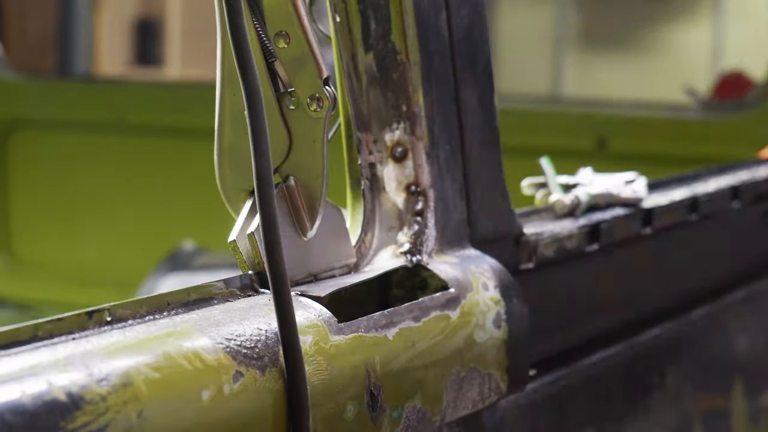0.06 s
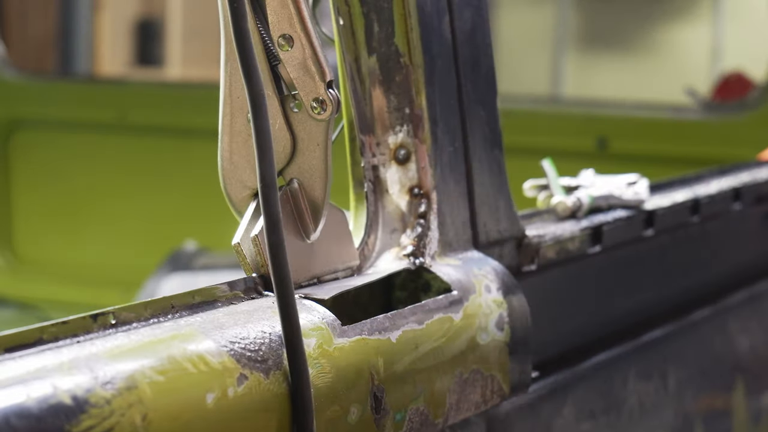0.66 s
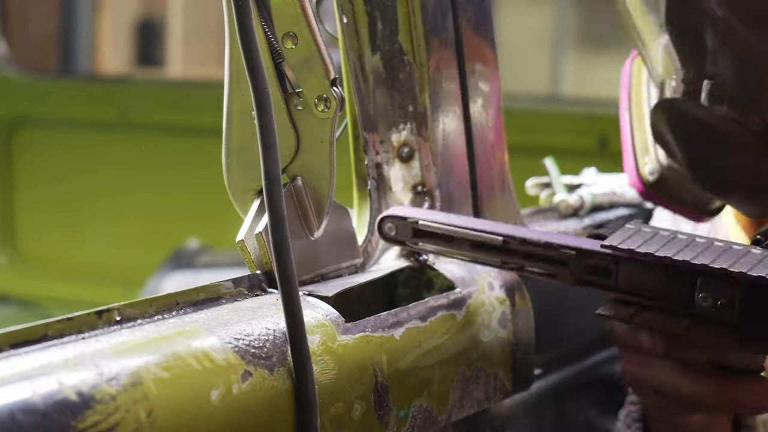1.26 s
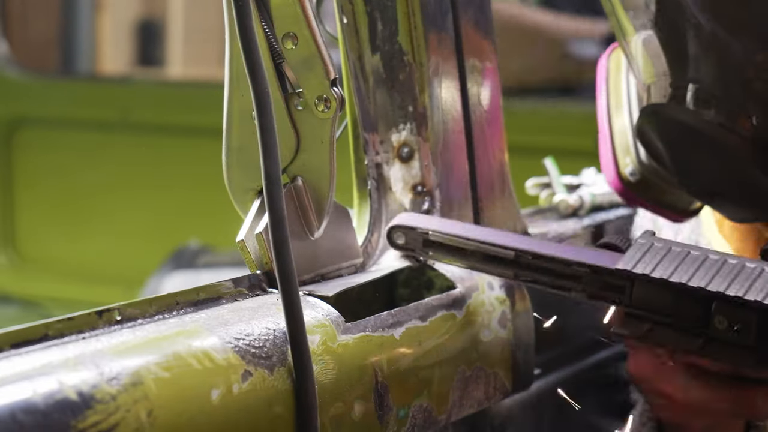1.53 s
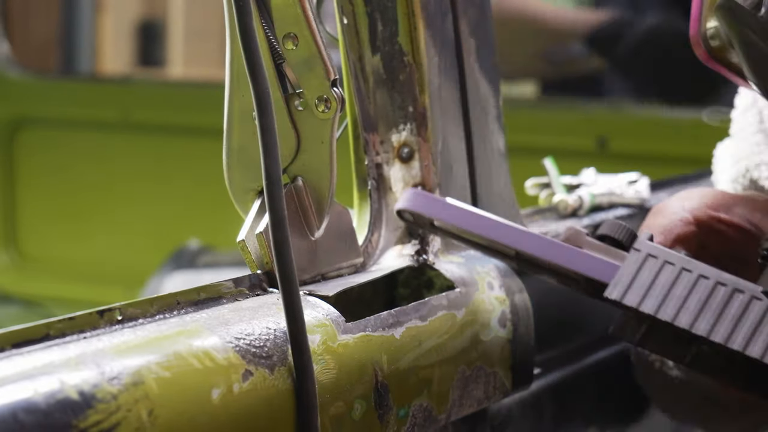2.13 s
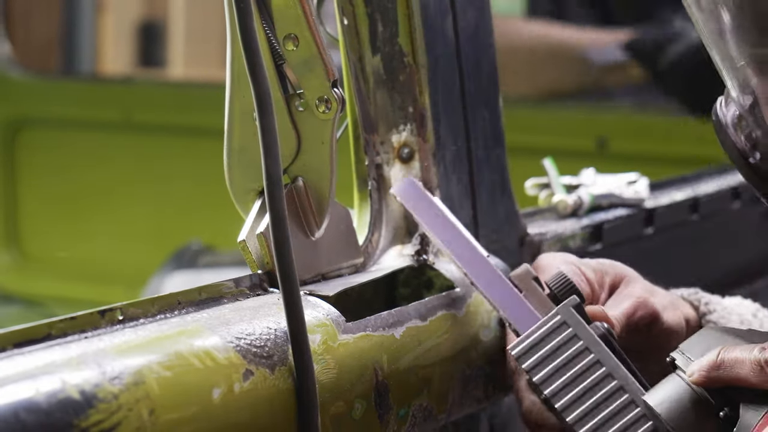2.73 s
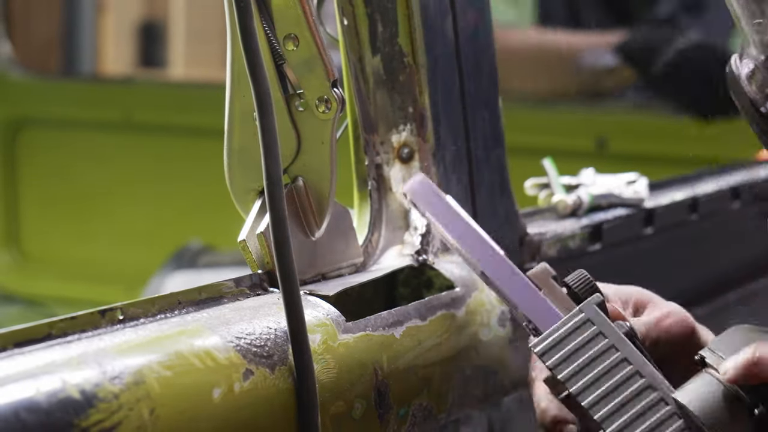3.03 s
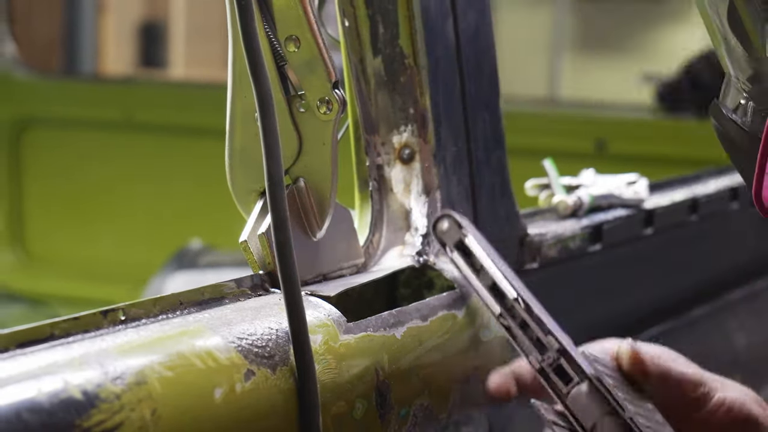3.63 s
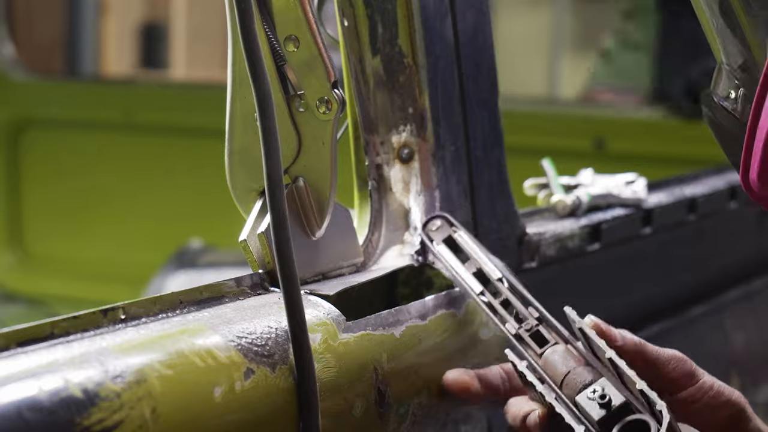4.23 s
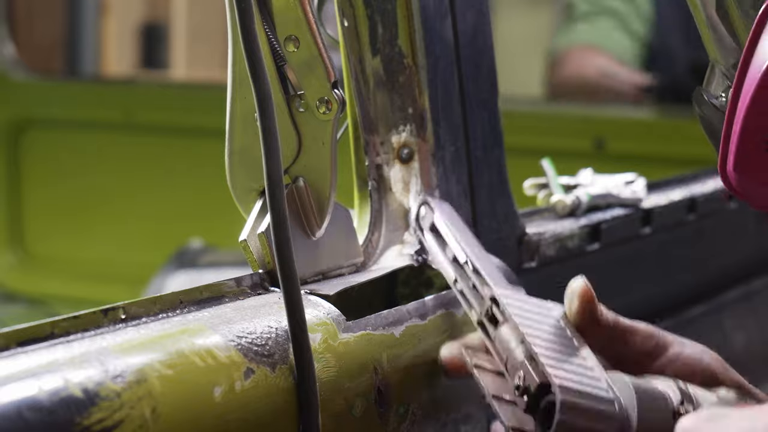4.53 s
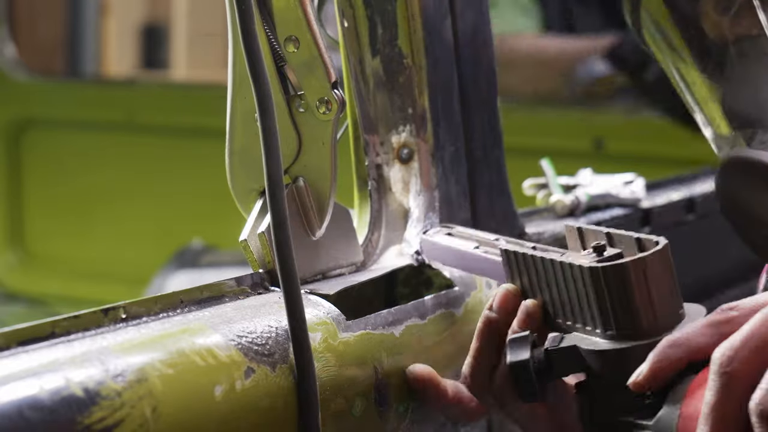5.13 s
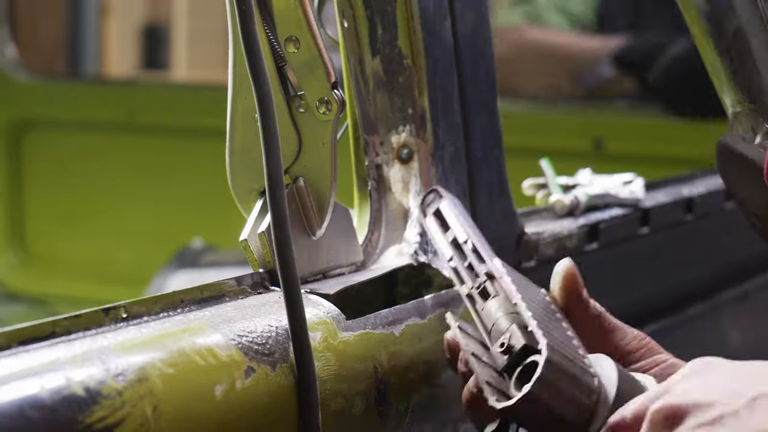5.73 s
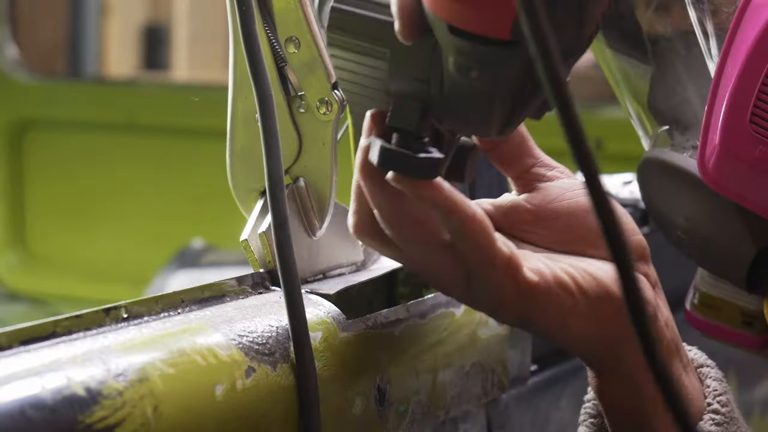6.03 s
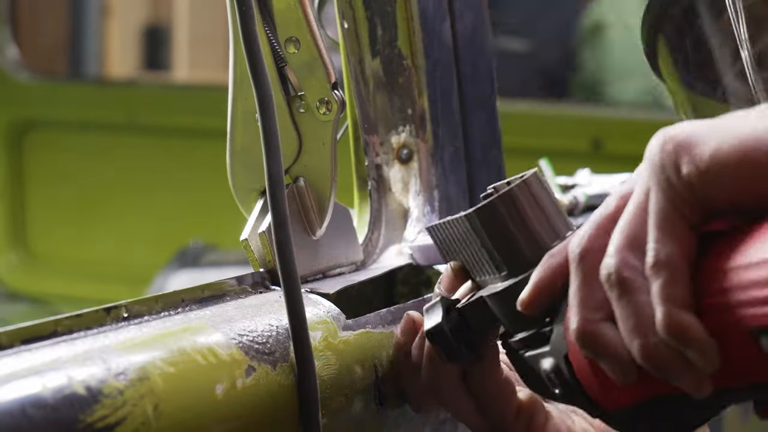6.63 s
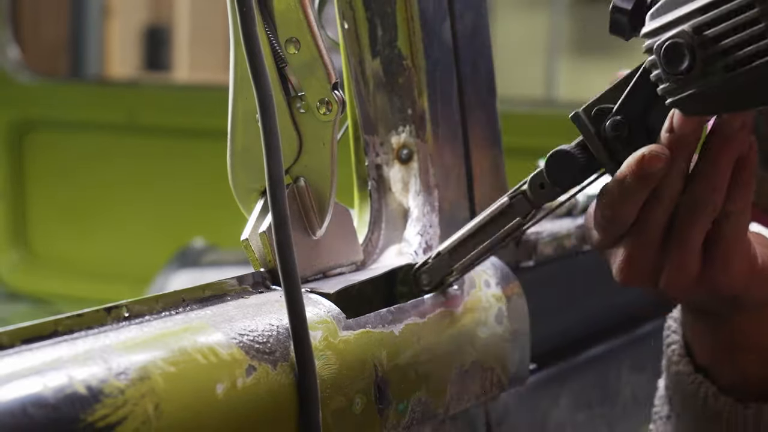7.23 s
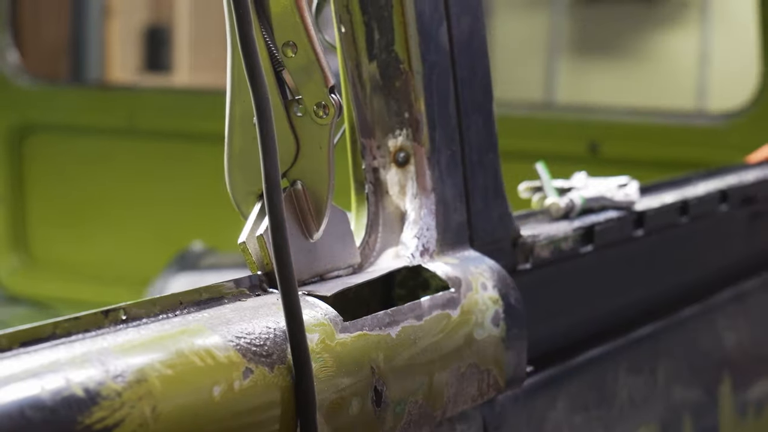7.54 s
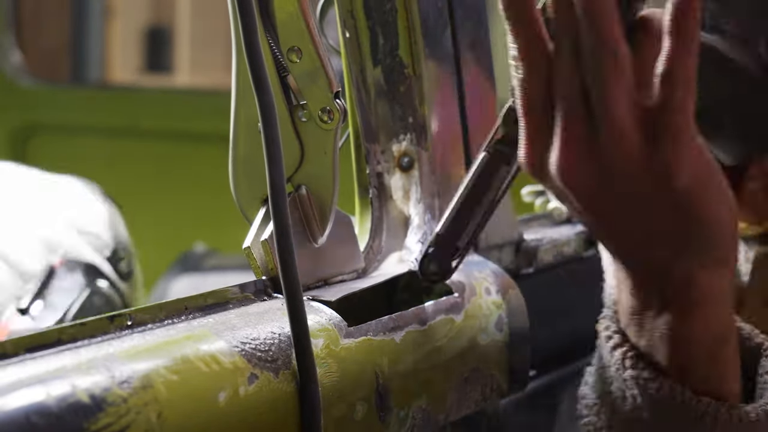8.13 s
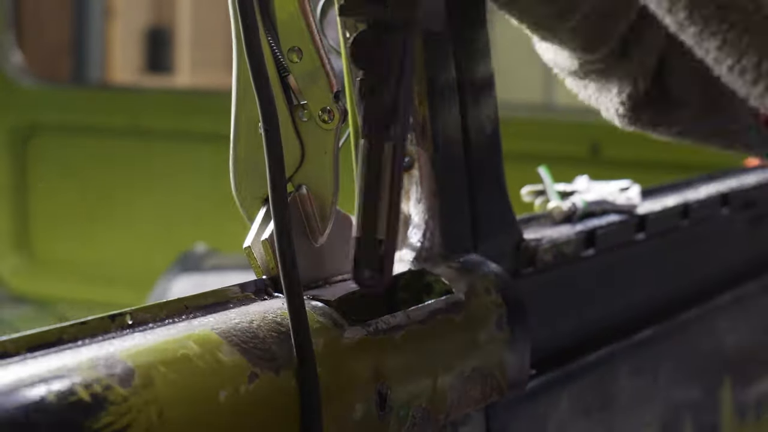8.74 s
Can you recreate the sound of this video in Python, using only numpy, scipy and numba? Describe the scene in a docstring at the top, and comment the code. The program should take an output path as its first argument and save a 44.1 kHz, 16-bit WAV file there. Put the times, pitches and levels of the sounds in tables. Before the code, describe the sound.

A narrow electric belt sander grinds welded steel close by in an otherwise quiet workshop. A few hollow knocks on the panel come first, then the trigger ticks and the motor starts. Its hum and thin whine waver as the belt rasps and chatters, with a metallic ring shifting in pitch. After a long run the motor winds down, there is a brief pause with light clicks, and two short bursts of grinding follow.

```python
"""A finger belt sander dresses a weld on a sheet-steel car body in a quiet workshop.
First a sleeve rustles and hands bump the panel. A second in, the trigger ticks and the motor spins up
with one brief stutter: the rotor hums, its commutator whines, and the belt's grit rasps on the steel.
Each press drags the speed down. Near seven seconds the fan's squeal swells, then the trigger is let go,
the drive whirrs to a stop and a faint whistling hiss fills the pause. Two short bursts follow."""
import sys
import numpy as np
from scipy import signal
from scipy.fft import rfft, irfft, next_fast_len
from scipy.io import wavfile
from scipy.ndimage import uniform_filter1d
from numba import njit

SR = 44100
rng = np.random.default_rng(int(sys.argv[2]) if len(sys.argv) > 2 else 0)


def to_wav(s):
    """Save 16-bit WAV."""
    ch = np.atleast_2d(s).T  # columns
    pcm = np.round(np.clip(ch, -1, 1) * 32767)  # PCM
    wavfile.write(sys.argv[1], SR, pcm.astype(np.int16))


N = 391166
TIME = np.arange(N) / SR


def from_db(db):
    """Decibels to gain."""
    return 10 ** (np.asarray(db) / 20)


def rms_one(x):
    """Scale to an rms of one."""
    return x / np.sqrt(np.mean(x ** 2) + 1e-20)


def automation(rows):
    """One curve per column, gliding between the times in the first column."""
    times, *columns = np.transpose(rows)
    return [np.interp(TIME, times, column) for column in columns]


def gate(start, end, fade=0.0015):
    """Fully open between two moments, with straight fades outside them."""
    return np.clip((TIME - start) / fade + 1, 0, 1) * np.clip((end - TIME) / fade + 1, 0, 1)


def hold(start, end, ramp):
    """Open between two moments, with smooth ramps centred on them."""
    return np.sin(np.pi / 2 * np.clip(np.minimum(TIME - start, end - TIME) / ramp + .5, 0, 1)) ** 2


def swell(centre, length):
    """A rounded hump of height one."""
    return np.exp(-np.square(np.minimum(np.square(2 * (TIME - centre) / length), 10)))


def drift(rate):
    """Smooth random wander of spread one; a higher rate is more restless."""
    pole = np.exp(-40 * np.pi * rate / SR)
    slow = signal.lfilter([1], [1, -2 * pole, pole * pole], rng.standard_normal(N // 20 + 2002))[2000:]
    return np.interp(np.arange(N) / 20, np.arange(len(slow)), rms_one(slow))


def equalise(x, curve):
    """Apply an EQ curve that rolls off beyond its ends; rms one."""
    hz, db = np.transpose(curve)
    size = next_fast_len(N)
    bins_hz = np.maximum(np.arange(size // 2 + 1) * SR / size, 1)
    skirts = np.minimum(bins_hz / hz[0], 1) ** 4 * np.minimum(hz[-1] / bins_hz, 1) ** 8
    gain = from_db(np.interp(np.log(bins_hz), np.log(hz), db))
    return rms_one(irfft(rfft(x, size) * skirts * gain, size)[:N])


def lowpass(x, corner_hz):
    """A gentle one-pole treble cut."""
    return signal.sosfilt(signal.butter(1, corner_hz, fs=SR, output="sos"), x)


def resonate(x, hz, width_hz):
    """A two-pole resonance with unit gain at its peak."""
    r = np.exp(-np.pi * width_hz / SR)
    feedback = [1, -2 * r * np.cos(2 * np.pi * hz / SR), r * r]
    return signal.lfilter(np.array([1, 0, -1]) * (1 - r * r) / 2, feedback, x)


@njit
def sweep(x, angle, r):
    """A two-pole resonance whose centre (pole angle) and width (pole radius) glide."""
    y = np.zeros(len(x))
    for i in range(2, len(x)):
        drive = (x[i] - x[i - 2]) * (1 - r[i] ** 2) / 2
        y[i] = drive + 2 * r[i] * np.cos(angle[i]) * y[i - 1] - r[i] ** 2 * y[i - 2]
    return y


def narrow_noise(hz, width_hz):
    """Pitched noise, run twice through one resonance; rms one."""
    return rms_one(resonate(resonate(rng.standard_normal(N), hz, width_hz), hz, width_hz))


def noise_bands(bands):
    """A stack of pitched noises, each at its own level."""
    return sum(from_db(db) * narrow_noise(hz, width) for hz, width, db in bands)


def grit(grains_per_s=9000, spread_db=3.0, hiss=0.52):
    """Countless tiny grains of uneven size over a smooth hiss."""
    sizes = from_db(spread_db * np.minimum(rng.exponential(1, N), 5)) * rng.choice([-1, 1], N)
    grains = sizes * (rng.random(N) < grains_per_s / SR)
    return rms_one(grains) + hiss * rng.standard_normal(N)


def flickering_hiss(curve, level_db, flicker_db):
    """Shaped noise with an unsteady level."""
    return equalise(rng.standard_normal(N), curve) * from_db(level_db - flicker_db * drift(23))


# The colour of the room. Each row: frequency in Hz, EQ gain in dB.
ROOM_EQ = [(20, -22), (60, -16), (228, -5.5), (304, -10), (497, -2), (1410, -20.5), (1560, -3.5),
           (1780, -27), (3230, -20), (4200, -27.5), (6700, -35), (15000, -59)]
# Thin whistles in the room. Each row: pitch in Hz, width in Hz, level in dB.
ROOM_WHISTLES = [(1602, 35, -82), (3240, 66, -77)]
def room_tone():
    """The workshop's quiet bed of hiss and faint whistles."""
    return flickering_hiss(ROOM_EQ, level_db=-63, flicker_db=3) + noise_bands(ROOM_WHISTLES)


def rustle(end_s=1, level_db=-73, spread_db=5):
    """Sleeve and cable brush the bodywork until the hands find their grip."""
    grains = grit(grains_per_s=1900, spread_db=4, hiss=.3)
    brush = equalise(grains, [(300, 0), (1200, -5), (3500, 3), (8000, -8.5), (15000, -22)])
    return gate(0, end_s, fade=.03) * brush * from_db(level_db + spread_db * np.minimum(drift(47), 2))


# The panel's ring. Each row: multiple of the lowest mode, typical relative level in dB.
PANEL_MODES = [(1, -1), (1.879, 2.5), (2.9, -3), (4.0, -1.5), (4.8, -8), (7.4, -11.5)]
# The scuff of a bump. Each row: frequency in Hz, EQ gain in dB.
SCUFF_EQ = [(50, -7), (130, -1), (240, 5.5), (500, 2.5), (1000, 0.5), (1500, -10.5), (2300, -17.5),
            (3800, -8), (5500, -29), (12000, -44)]
# Hands and tool bump the panel, each at a spot with its own pitch.
# Each row: start in seconds, peak in dB, length in seconds, lowest mode in Hz, treble cut in Hz.
PANEL_BUMPS = [(0.008, -35, 0.035, 163.3, 1800), (0.21, -28, 0.017, 220.6, 600),
               (0.26, -42, 0.008, 330, 1500), (0.319, -26, 0.0084, 196, 2200),
               (0.43, -32, 0.017, 157, 1200), (0.558, -27.5, 0.018, 179.5, 1800),
               (0.577, -31, 0.015, 149, 1000), (0.641, -42.5, 0.016, 197, 1200),
               (0.81, -36, 0.016, 159, 120), (0.896, -24, 0.011, 215.3, 280), (7.473, -37, 0.013, 188, 598)]
def bumps(size=6000, scuff_db=-4, uneven_db=4.0, attack_s=0.0034):
    """Each bump is a short scuff and a hollow ring of the panel, choked by the hand."""
    out, t = np.zeros(N + size), np.arange(size) / SR
    multiples, levels = np.transpose(PANEL_MODES)
    scuffs = from_db(scuff_db) * equalise(rng.standard_normal(N), SCUFF_EQ)
    for start, db, length, hz, cut_hz in PANEL_BUMPS:
        at = int(start * SR)
        strengths = from_db(levels + uneven_db * rng.standard_normal(len(levels)))
        cycles = np.outer(hz * multiples, t) + rng.random((len(levels), 1))
        ring = rms_one(strengths @ np.sin(2 * np.pi * cycles))
        envelope = (1 - np.exp(-(t / attack_s) ** 2)) * np.exp(-(t / length) ** 4)
        thud = lowpass(envelope * (ring + scuffs[at:at + size]) + 1e-18, cut_hz)
        out[at:at + size] += from_db(db) * thud / np.abs(thud).max()
    return out[:N]


# Sharp ticks. Each row: start in seconds, peak in dB, attack and length in seconds, pitch in Hz.
SHARP_TICKS = [(0.029, -49, .0005, .003, 6000), (0.064, -38, .025, 0.015, 5570),
               (0.658, -50, .015, .016, 7000), (0.897, -40, 0.0047, 0.017, 1600),
               (1.022, -27, .001, 0.014, 4220), (1.178, -27, 0.0033, 0.022, 4470),
               (1.206, -26.5, .002, 0.01, 3040), (7.449, -28, 0.00095, 0.0063, 4940),
               (7.482, -28, 0.00081, 0.011, 4520), (7.522, -37, 0.0011, 0.0079, 7110),
               (7.908, -26, .0005, 0.005, 7990), (7.915, -27, 0.0011, 0.017, 3920),
               (8.587, -26, 0.0011, 0.014, 3960)]
def ticks(size=3000, width_share=0.62):
    """Handling, trigger and belt give brief, bright snaps, each in one broad resonance."""
    out, t = np.zeros(N + size), np.arange(size) / SR
    for start, db, attack, length, hz in SHARP_TICKS:
        at, width_hz = int(start * SR), width_share * hz
        envelope = (1 - np.exp(-(t / attack) ** 2)) * np.exp(-(2 * t / length) ** 2)
        snap = resonate(resonate(envelope * rng.standard_normal(size), hz, width_hz), hz, width_hz)
        out[at:at + size] += from_db(db) * snap / np.abs(snap).max()
    return out[:N]


# The finger on the trigger. Each row: pull, release and coasting time constant, all in seconds.
TRIGGER_PULLS = [(1.023, 1.157, 0.072), (1.214, 7.401, .08), (7.911, 8.419, 0.087), (8.595, 8.86, 0.1)]
def spin(start_share=.68, spin_up_s=.022, slack_s=.004, run_out_s=.17):
    """Share of full speed: the motor jumps, closes in on the rest, and coasts once released."""
    share = 1e-6
    for pull, release, coast_s in TRIGGER_PULLS:
        turning = gate(pull, release + run_out_s, slack_s)   # slack is taken up; friction ends the run
        rise = 1 - (1 - start_share) * np.exp(-np.maximum(TIME - pull, 0) / spin_up_s)
        fall = np.exp(-np.maximum(TIME - release, 0) / coast_s)
        share = np.maximum(share, turning * rise * fall)
    return share


# The belt is pressed on the weld.
# Each row: start and end in seconds, rotor sag in turns per second, added chatter from 0 to 1.
HAND_PRESSES = [(1.002, 1.44, 22.4, 0.38), (1.439, 1.749, 35.6, 0.54), (1.753, 1.871, 14.7, 0.12),
                (1.991, 2.471, 24.7, 0.49), (2.68, 3.049, 10.3, 0.2), (3.281, 3.72, 14.5, 0.24),
                (4.291, 4.547, 18.7, 0.27), (5.07, 5.14, 21.7, 0.21), (5.21, 5.72, 18, 0.4),
                (6.258, 6.494, 11, 0.3), (6.69, 6.903, 7.6, 0.2), (7.176, 7.254, 23, 0.01),
                (8.044, 8.14, 40, 0.13), (8.804, 8.962, 11, 0.07)]
def load(ramp_s=0.091, light_chatter=0.052):
    """The rotor sags and the belt chatters harder as the hand leans in."""
    sag, chatter = 0, light_chatter
    for start, end, turns, depth in HAND_PRESSES:
        pressed = hold(start, end, ramp_s)
        sag, chatter = sag + turns * pressed, chatter + depth * pressed
    return sag, chatter


def rotor_speed(share, sag, chatter, cold_hz=502, warming_hz_per_s=1.4, surge_hz=15, swing_hz=20):
    """Turns per second: the motor creeps up as it warms, sags under load and surges as the belt catches."""
    wobble = 1 + 0.0016 * drift(94) + .004 * drift(5.03)   # fast jitter, slow sway of the hand
    free = (cold_hz + warming_hz_per_s * TIME) * wobble
    surge_phase = 2 * np.pi * np.cumsum(surge_hz * (1 + .33 * drift(14))) / SR
    surge = np.sin(surge_phase) * (1 + 0.35 * drift(9))
    snags = 0.4 * drift(67.5)
    return share * (free - sag + swing_hz * chatter * (surge + snags))


# The hum's overtones. Each row: multiple of the rotor rate, level in dB relative to the hum.
HUM_OVERTONES = [(2, -21), (3, -27.5), (4, -22.5), (7, -18), (8, -10.5), (10, -11.5), (12, -11.5)]
# The housing rattles along. Each row: pitch in Hz, width in Hz, level in dB relative to the hum.
HOUSING_RATTLE = [(546, 400, -15.5), (767, 284, -13.5)]
def rotor_hum(angle, spun_up, level_db, rattle_db=-52):
    """Unbalance hums once a turn and shakes the housing."""
    tone = np.sqrt(2) * np.sin(angle + 0.63 * drift(31)) * (1 + 0.041 * drift(23))
    rattle = drift(45) * np.sin(angle) + drift(45) * np.cos(angle)
    blur = np.minimum(from_db(rattle_db - level_db), .9)   # a weak hum is mostly rattle
    hum = np.sqrt(1 - blur ** 2) * tone + blur * rattle
    overtones = sum(from_db(db) * np.sin(round(order) * angle) * (1 + 0.55 * drift(39))
                    for order, db in HUM_OVERTONES)
    fade = np.interp(spun_up, [0.59, 0.8], [0, 1])   # the hum dies as the rotor slows
    return from_db(level_db) * fade * (hum + overtones + noise_bands(HOUSING_RATTLE))


def commutator_whine(angle, speed, spun_up, level_db, bars=30, ring_hz=8670, width_hz=630, ring_db=4):
    """The commutator whines once per bar; as the pitch falls it passes a resonance of the housing."""
    whine = np.sin(bars * angle) * (1 + 0.55 * drift(110))
    ring = from_db(ring_db) * np.exp(-((bars * speed - ring_hz) / width_hz) ** 2)
    return from_db(level_db) * whine * (spun_up ** 4 + ring)


def fan_squeal(angle, speed, hum_db, blades=6, vent_hz=2944, width_hz=270):
    """The fan's blades pass a vent in step with the rotor, loudest where they meet its resonance."""
    level_db = hum_db - 10 + 3.5 * swell(centre=7.26, length=0.28)   # the vent turns toward the listener
    vent = 1 / np.hypot(1, 2 * (blades * speed - vent_hz) / width_hz)
    return from_db(level_db) * vent * np.sqrt(2) * np.sin(blades * angle) * (1 + 0.3 * drift(79))


# The hum's fader as the tool is turned. Each row: time in seconds, level in dB at full speed.
HUM_FADER = [(1.05, -36.5), (1.5, -37), (1.85, -39.5), (1.98, -35), (2.15, -36), (3.0, -38.5),
             (3.45, -42.5), (4.0, -40), (4.45, -45), (4.6, -43.5), (4.92, -42), (5.01, -45.5), (5.1, -48),
             (5.55, -48.5), (5.83, -45), (5.96, -51.5), (6.1, -53), (6.17, -44.5), (6.26, -39),
             (6.6, -44.5), (7.04, -45), (7.13, -38.5), (7.38, -38.5), (7.98, -43.5), (8.09, -49),
             (8.2, -42), (8.43, -41.5), (8.68, -44.5), (8.8, -51.5)]
# The whine's fader as the tool is turned. Each row: time in seconds, level in dB before chatter loss.
WHINE_FADER = [(1.05, -49), (1.6, -44.5), (2.85, -46), (3.17, -40), (3.5, -53), (3.85, -44), (5.2, -39),
               (6.1, -46), (6.5, -47), (6.9, -41), (7.35, -42), (7.97, -48), (8.3, -41), (8.6, -43),
               (8.85, -36)]
def motor(speed, speed_db, chatter, chatter_loss_db=2.5, flutter_db=2):
    """Hum, whine and squeal, locked to one shaft; a skipping belt shakes the whine apart."""
    angle = 2 * np.pi * np.cumsum(speed) / SR
    spun_up = np.minimum(speed / np.median(speed), 1)
    hum_db = automation(HUM_FADER)[0] + 1.06 * speed_db
    whine_db = automation(WHINE_FADER)[0] - chatter_loss_db * chatter + flutter_db * drift(3.7)
    return (rotor_hum(angle, spun_up, hum_db) + commutator_whine(angle, speed, spun_up, whine_db)
            + fan_squeal(angle, speed, hum_db))


# Belt and steel ring together at a pitch set by the contact.
# Each row: time in seconds, pitch in Hz, width in Hz, level in dB against the rasp before sliding loss.
CONTACT_PATH = [(1.1, 3660, 1000, -0.5), (1.7, 3300, 960, -6), (2.33, 3700, 1103, -2.5),
                (3.1, 3343, 950, -13), (4.15, 6886, 1200, -11), (4.35, 7040, 1197, -4),
                (4.92, 7250, 1195, -7.5), (5.02, 5800, 1000, 2), (5.16, 4590, 852, -1.5),
                (5.42, 4545, 800, 1), (5.75, 4393, 948, -6), (5.85, 5280, 1200, -11),
                (5.92, 6080, 1390, -1), (6.02, 6070, 1402, -0.5), (6.11, 5760, 1403, 0),
                (6.14, 5670, 1405, -8), (6.19, 3870, 1097, 4), (6.3, 3620, 1100, 2), (6.39, 5350, 1300, 0),
                (6.9, 5810, 1200, -27), (7.3, 4700, 1200, -4), (8.87, 4770, 1100, -10)]
def contact_ring(overtone_db=-10, slide_loss_db=1.3):
    """The hollow, gliding ring at the contact, and its share of the mix, which drops as it slides."""
    hz, width_hz, level_db = automation(CONTACT_PATH)
    angle, r = 2 * np.pi * hz / SR, np.exp(-np.pi * width_hz / SR)
    ring, octave = (rms_one(sweep(sweep(grit(), k * angle, r), k * angle, r) / np.sqrt(width_hz))
                    for k in (1, 2))
    damping = np.minimum(4500 / hz, 1) ** 3   # high overtones are damped
    octaves_per_s = uniform_filter1d(np.abs(np.gradient(np.log2(hz))) * SR, size=1000)
    share = from_db(level_db - slide_loss_db * octaves_per_s)
    return ring + from_db(overtone_db) * damping * octave, share


def skipping(chatter, rate_hz=64, sharpness=9.7, height=2.5):
    """On the edge of the weld the belt skips, landing in short, uneven kicks; mean power one."""
    phase = 2 * np.pi * np.cumsum(rate_hz * (1 + 0.252 * drift(27))) / SR
    kicks = np.exp(sharpness * (np.cos(phase) - 1)) * (1 + 0.16 * drift(48))
    gain = 1 + height * chatter * kicks
    return gain / np.sqrt(uniform_filter1d(gain ** 2, size=4000))


def belt_pressure(speed, turns_per_slap=3.3, sharpness=1.6, slap_db=1.16, flap_db=0.5, judder_db=0.72):
    """The belt slaps the work every few rotor turns, flaps loosely between, and judders in the hand."""
    phase = 2 * np.pi * np.cumsum(speed / turns_per_slap * (1 + 0.1996 * drift(60))) / SR
    slaps = np.exp(sharpness * (np.cos(phase) - 1)) * (1 + 0.4 * drift(105))
    db = slap_db * slaps / slaps.std() + flap_db * narrow_noise(127, 150) + judder_db * drift(35)
    return rms_one(from_db(db))


def sheet_shimmer(x, depth=0.45, width_hz=210, count=22):
    """As the contact wanders, modes of the sheet swell and fade."""
    modes = np.geomspace(1300, 12000, count) * rng.uniform(0.908, 1.047, count)
    return x + sum(depth * drift(11.5) * resonate(x, hz, width_hz * np.sqrt(hz / 3000)) for hz in modes)


# The grind's bright rasp, mid-range body and treble fizz. Each row: frequency in Hz, EQ gain in dB.
RASP_EQ = [(2300, -13), (2700, -9.5), (3050, -1), (3600, 0.5), (4300, -1), (5200, 1.5), (6300, -0.5),
           (7400, -0.5), (8300, -2), (9300, -3), (9900, -22), (10800, -80)]
BODY_EQ = [(180, -16), (300, -5), (600, -3), (850, -2), (1050, -3), (1350, 1.5), (1650, -0.5), (2150, 2),
           (2700, 2), (3300, -13)]
FIZZ_EQ = [(8800, -7), (9800, 7), (11000, 5.5), (12200, 0.5), (13300, 2), (15700, -13), (17000, -20)]
# The pillar rings under the belt. Each row: pitch in Hz, width in Hz, level in dB relative to the rasp.
PILLAR_RINGS = [(3067, 210, -18), (3730, 220, -18.5)]
def grinding(speed, chatter, rasp_db, body_db, fizz_db, skip_share=0.74):
    """Abrasive grains tear at the steel: rasp, body, fizz and contact ring all pulse with the belt."""
    ring, ring_share = contact_ring()
    bite = (1 + skip_share * (skipping(chatter) - 1)) / np.sqrt(1 + ring_share ** 2)
    rasp = bite * (noise_bands(PILLAR_RINGS) + equalise(grit(), RASP_EQ))
    body = from_db(body_db) * equalise(grit(), BODY_EQ)
    fizz = from_db(fizz_db) * equalise(grit(), FIZZ_EQ) * np.sqrt(np.abs(speed) / np.median(speed))
    gain = belt_pressure(speed) * from_db(rasp_db)
    return gain * (sheet_shimmer(rasp + body + fizz) + bite * ring_share * ring)


def dulled(x, share, corner_hz=6500):
    """A slow belt loses its treble."""
    low = lowpass(x, corner_hz)
    return low + share * (x - low)


# The low end under the grind. Each row: frequency in Hz, EQ gain in dB.
RUMBLE_EQ = [(20, -8), (45, -12), (70, -11), (125, -1.5), (230, 4), (400, -7), (700, -23)]
def panel_rumble(drive_db, offset_db=-21, lumps_db=3.5):
    """The belt shakes the panel into a faint, lumpy rumble."""
    gain = from_db(drive_db + offset_db + lumps_db * drift(8.1))
    return gain * equalise(rng.standard_normal(N), RUMBLE_EQ)


# The grind turns briefly hollow. Each row: centre in seconds, length in seconds, depth from 0 to 1.
HOLLOW_MOMENTS = [(1.083, 0.032, .97), (1.918, .032, .93), (3.171, .034, 0.8), (3.791, 0.031, 0.98),
                  (4.1, 0.023, .8), (5.34, 0.016, 0.83), (6.225, 0.031, 0.96), (6.374, .034, 1),
                  (6.665, 0.033, 0.91), (6.835, 0.02, 0.94), (7.217, 0.021, .8)]
def thinned(x, size=4096, count=18, low_hz=2886, high_hz=9020, width_hz=25, ring_db=1):
    """For a moment the broad rasp gives way to a cluster of narrow rings."""
    out, t = x.copy(), (np.arange(size) - size // 2) / SR
    for centre, length, depth in HOLLOW_MOMENTS:
        at = int(centre * SR) - size // 2
        broad = x[at:at + size]
        ring = rms_one(sum(resonate(broad, hz, width_hz) for hz in rng.uniform(low_hz, high_hz, count)))
        blend = min(depth, 1) * np.exp(-(2 * t / length) ** 4)
        out[at:at + size] = (1 - blend) * broad + blend * from_db(ring_db) * broad.std() * ring
    return out


# The ring of the arm and rollers. Each row: pitch in Hz, width in Hz, relative gain in dB.
ARM_MODES = [(2610, 180, 0), (3350, 290, 0), (4460, 440, -1), (5240, 260, -1), (7240, 560, -7)]
# The drive runs down. Each row: start in seconds, end in seconds, gain in dB.
RUN_DOWNS = [(1.174, 1.21, -53), (7.429, 7.56, -49.5), (8.45, 8.579, -41.5)]
def whirr(speed, knocks_per_turn=2, uneven=0.39, rub=0.034):
    """Once the motor lets go, the slack drive knocks into the arm, slower and slower."""
    knock_count = np.floor(knocks_per_turn * np.cumsum(speed) / SR)
    knocks = np.diff(knock_count, prepend=0) * (1 + uneven * rng.standard_normal(N))
    drive = knocks + rub * rng.standard_normal(N)
    ring = sum(from_db(db) * resonate(resonate(drive, hz, width), hz, 2 * width)
               for hz, width, db in ARM_MODES)
    return rms_one(ring) * sum(from_db(db) * gate(start, end, fade=0.0072) for start, end, db in RUN_DOWNS)


# The belt bears on the sill's corner. Each row: centre in seconds, level in dB, length in seconds.
SILL_SWELLS = [(2.0, -59, 1.45), (3.451, -55.5, 0.59)]
def sill_drone(hz=257, width_hz=150):
    """The hollow sill answers the belt with a low, wavering note."""
    envelope = sum(from_db(db) * swell(centre, length) for centre, db, length in SILL_SWELLS)
    return narrow_noise(hz, width_hz) * envelope


# Gusts from the tool. Each row: centre in seconds, level in dB, length in seconds.
AIR_GUSTS = [(3.0, -68, 3.5), (3.248, -55, 0.055), (4.64, -56, 0.042), (7.107, -46, 0.031),
             (7.265, -47, 0.15), (8.015, -46.5, 0.11), (8.187, -42, 0.042), (8.355, -49, 0.088),
             (8.7, -60, 0.13)]
# Their bassy buffeting. Each row: frequency in Hz, EQ gain in dB.
BUFFET_EQ = [(15, -11), (40, -2), (70, -0.5), (145, 2.5), (200, -1.5), (320, -9), (700, -28)]
def cooling_air():
    """Cooling air buffets the listener whenever the vents face that way."""
    envelope = sum(from_db(db) * swell(centre, length) for centre, db, length in AIR_GUSTS)
    return envelope * equalise(rng.standard_normal(N), BUFFET_EQ)


# The colour of the hiss in the pause. Each row: frequency in Hz, EQ gain in dB.
PAUSE_EQ = [(100, -12), (280, -0.5), (700, -5), (1050, 2), (1400, -9), (2200, -8), (3300, -6), (7000, -6),
            (9500, -12), (12000, -18), (15500, -25)]
# The whistles in that hiss. Each row: pitch in Hz, width in Hz, level in dB.
PAUSE_WHISTLES = [(1030, 212, -66), (1606, 61, -63), (3252, 140, -58.5), (9330, 120, -64)]
def pause_hiss(start_s=7.61, end_s=7.91):
    """A faint whistling hiss fills the longest pause."""
    hiss = flickering_hiss(PAUSE_EQ, level_db=-52, flicker_db=0.5) + noise_bands(PAUSE_WHISTLES)
    return gate(start_s, end_s, fade=0.018) * hiss


# The belt digs in. Each row: centre in seconds, boost of the grind in dB, length in seconds.
BELT_DIGS = [(2.3, 2.5, 0.27), (2.991, 2.5, 0.2), (4.73, 2, 0.063), (6.268, 1, 0.088)]
# The grind's balance. Each row: time in seconds, body and fizz in dB against the rasp at full speed.
GRIND_BALANCE = [(1.05, -15.5, -11), (1.9, -13.5, -13.5), (2.65, -9, -10.5), (3.2, -9, -12.5),
                 (3.55, -10.5, -16), (3.9, -10.5, -13), (4.6, -8.5, -12), (4.85, -11.5, -11.5),
                 (5.35, -10, -12.5), (5.8, -11, -11.5), (6.03, -15, -9.5), (6.25, -11, -15.5),
                 (6.8, -10.5, -12.5), (7.35, -9.5, -14), (8.07, -14, -10.5), (8.38, -6.5, -12),
                 (8.75, -13.5, -11)]
def sander(full_rasp_db=-35, rasp_power=0.93, body_power=0.67):
    """The whole tool on the steel; rasp and body each grow with their own power of the speed."""
    share, (sag, chatter) = spin(), load()
    speed, speed_db = rotor_speed(share, sag, chatter), 20 * np.log10(share)
    digs_db = sum(db * swell(centre, length) for centre, db, length in BELT_DIGS)
    rasp_db = full_rasp_db + rasp_power * speed_db + digs_db
    body_db, fizz_db = automation(GRIND_BALANCE)
    body_db += (body_power - rasp_power) * np.maximum(speed_db, -20)   # the sheet is the last to fade
    tones = motor(speed, speed_db, chatter)
    low_end = panel_rumble(rasp_db + body_db) + cooling_air() + sill_drone()
    grind = dulled(grinding(speed, chatter, rasp_db, body_db, fizz_db), share)
    return tones + whirr(speed) + thinned(grind + low_end)


def scene():
    """The sander and the handling over the quiet workshop, in mono."""
    return (room_tone() + pause_hiss() + sander() + bumps() + ticks() + rustle())[None]


def record(dry, ceiling=0.1, cutoff_hz=15800):
    """Peaks are rounded, and the top is cut steeply."""
    rounded = ceiling * np.tanh(dry / ceiling)
    return signal.sosfilt(signal.ellip(12, .1, 80, cutoff_hz, fs=SR, output="sos"), rounded)


dry = scene()
out = record(dry)
to_wav(out)
```